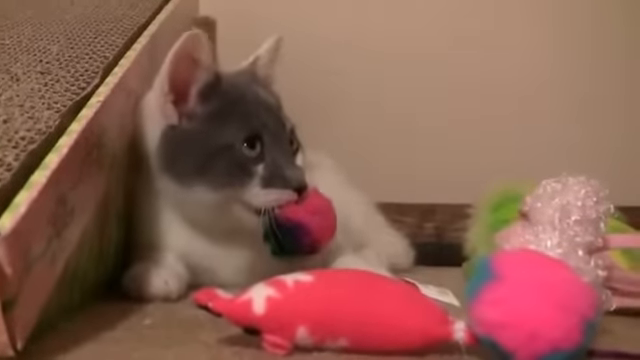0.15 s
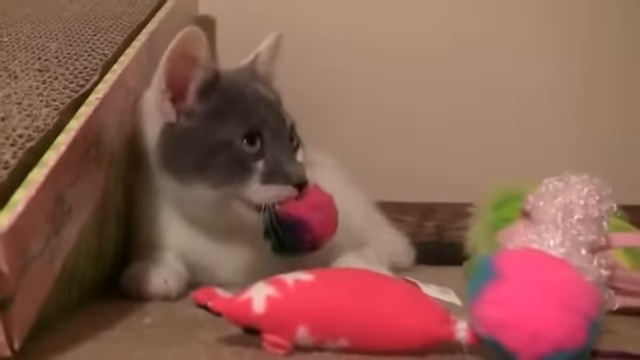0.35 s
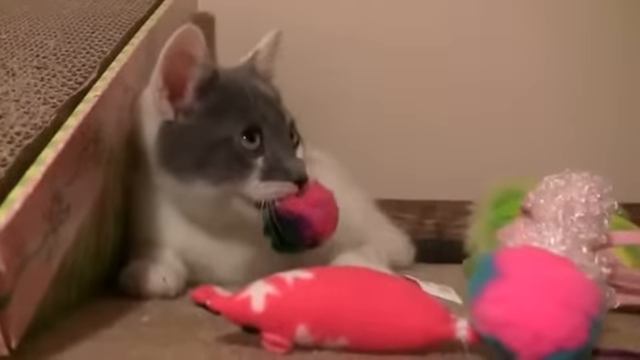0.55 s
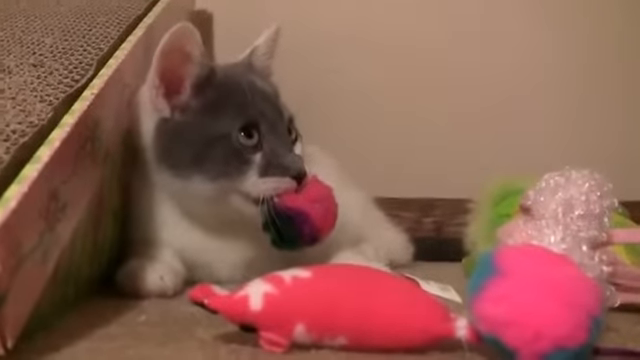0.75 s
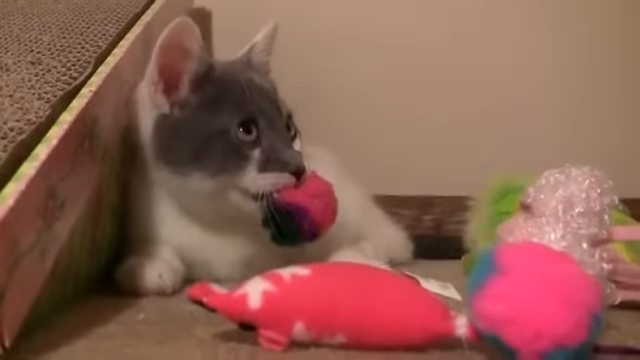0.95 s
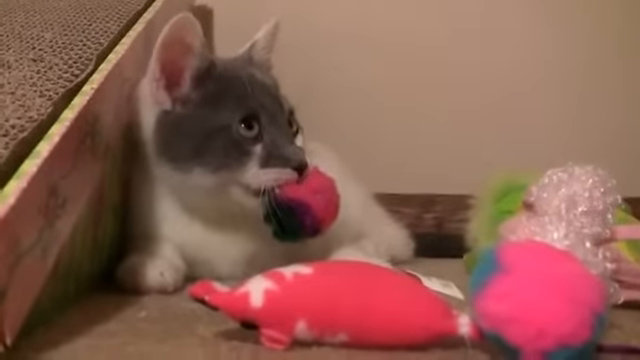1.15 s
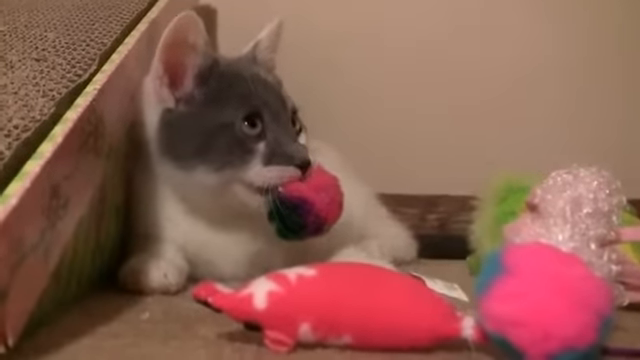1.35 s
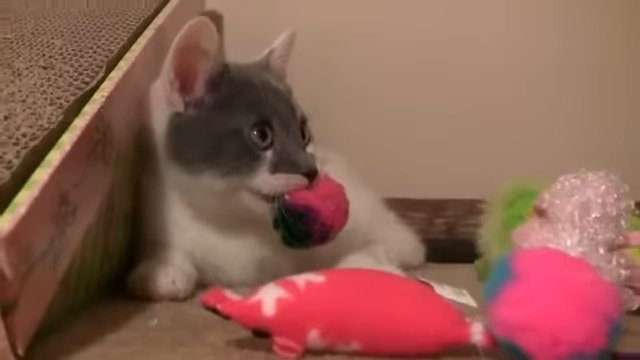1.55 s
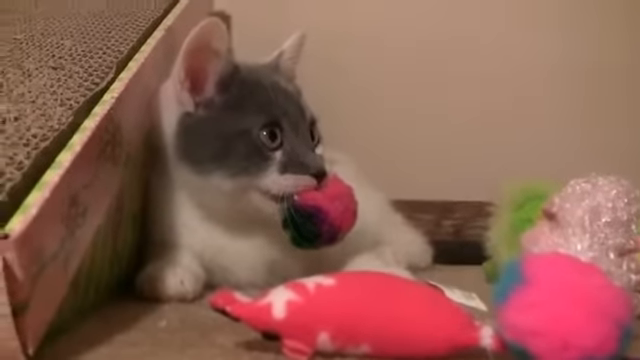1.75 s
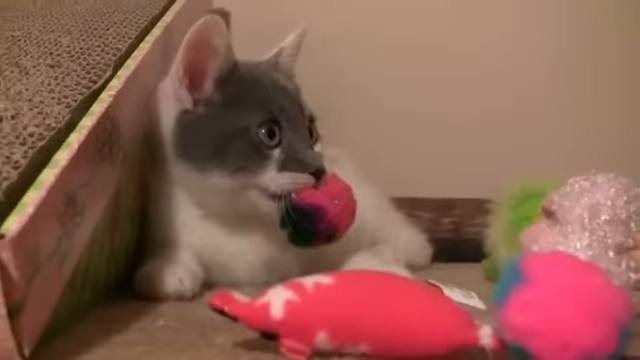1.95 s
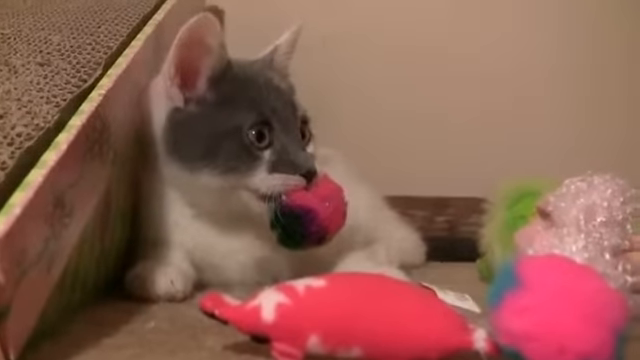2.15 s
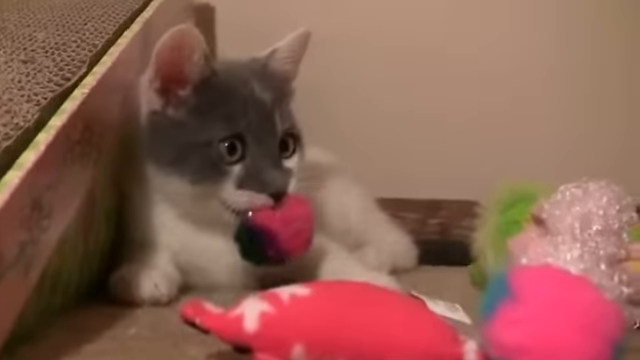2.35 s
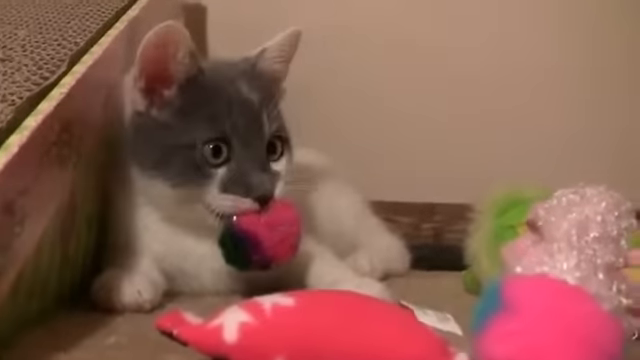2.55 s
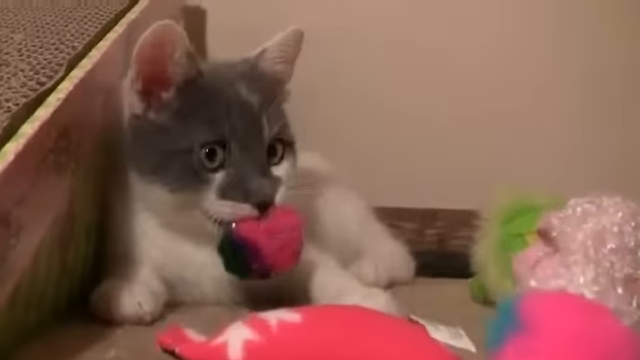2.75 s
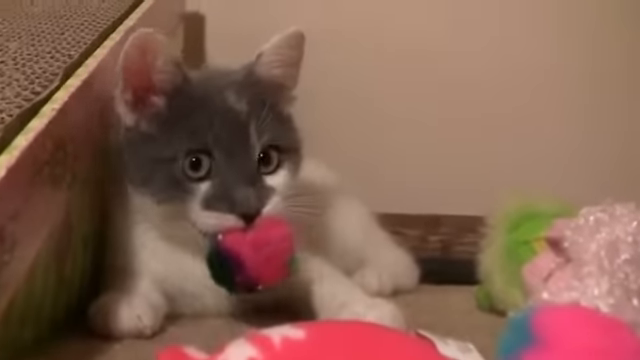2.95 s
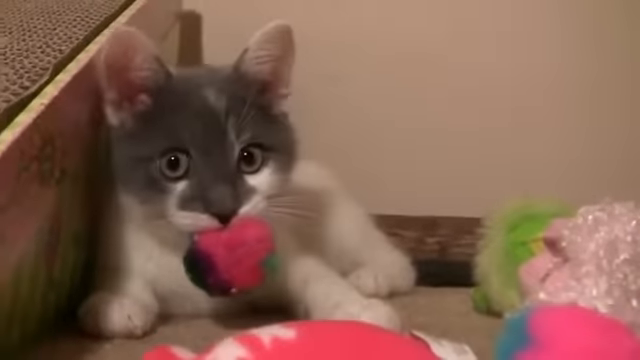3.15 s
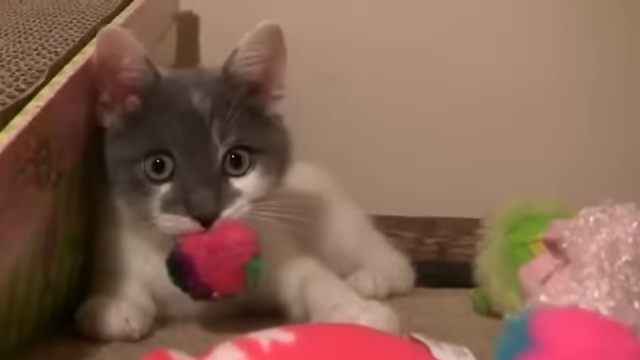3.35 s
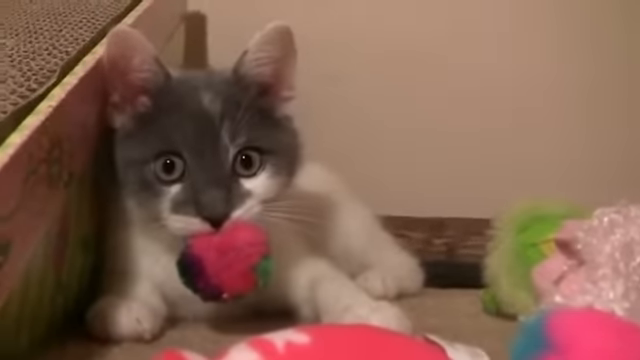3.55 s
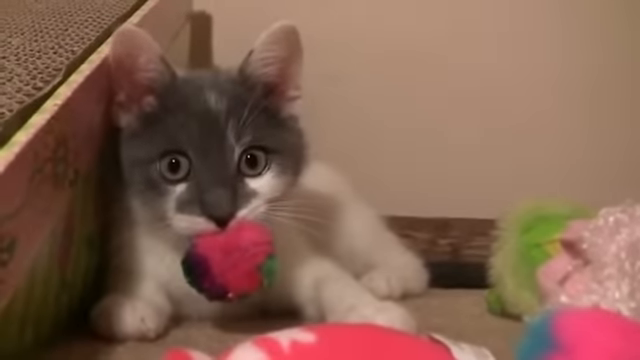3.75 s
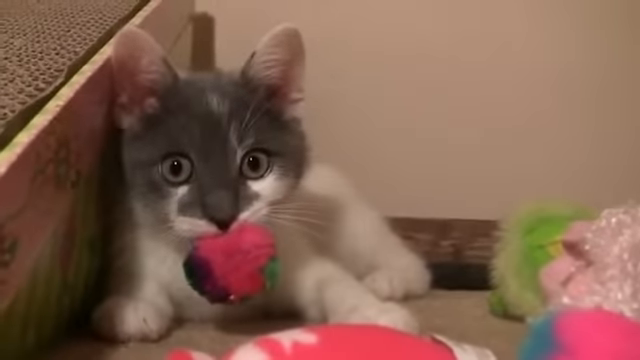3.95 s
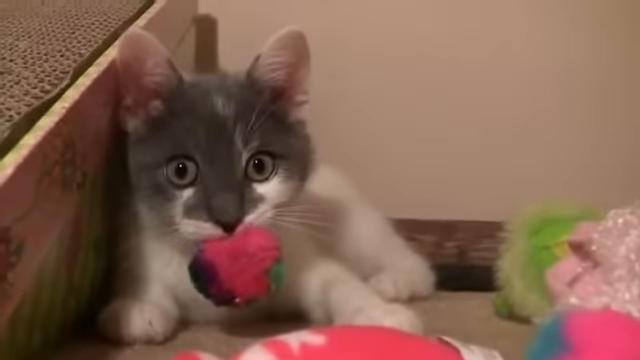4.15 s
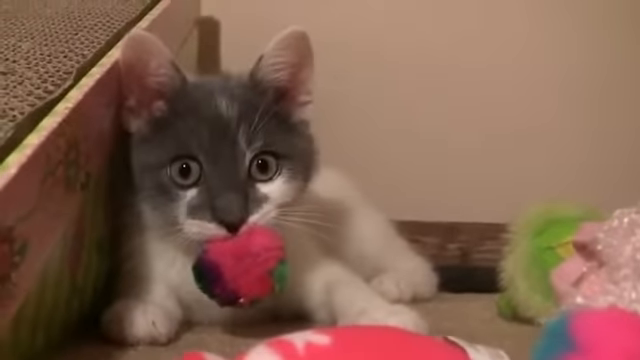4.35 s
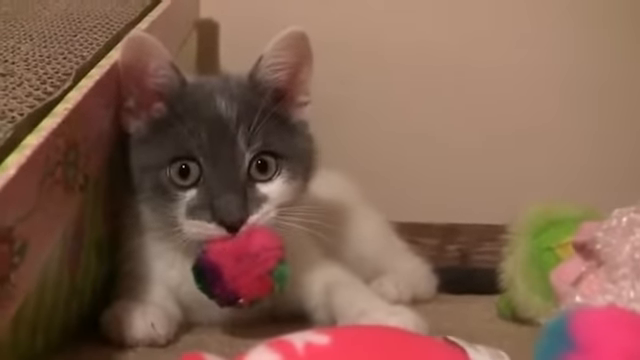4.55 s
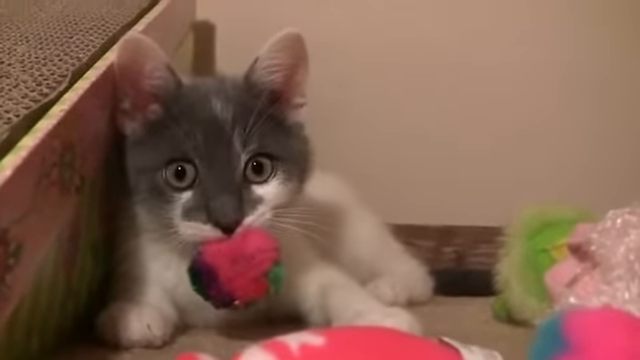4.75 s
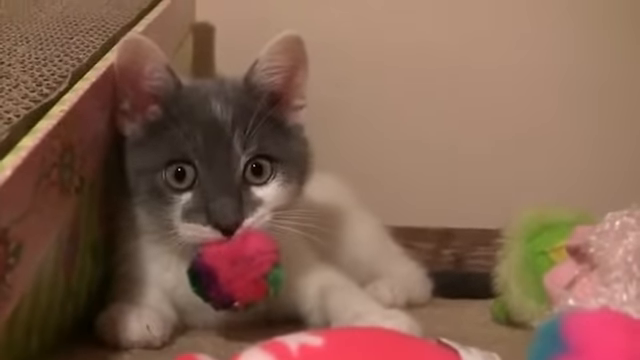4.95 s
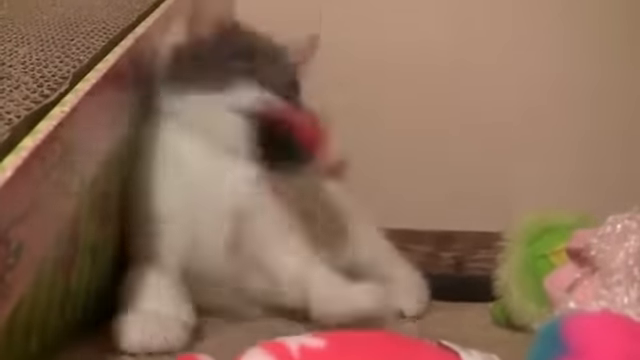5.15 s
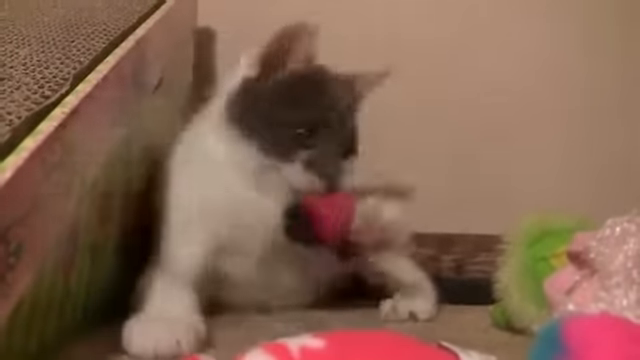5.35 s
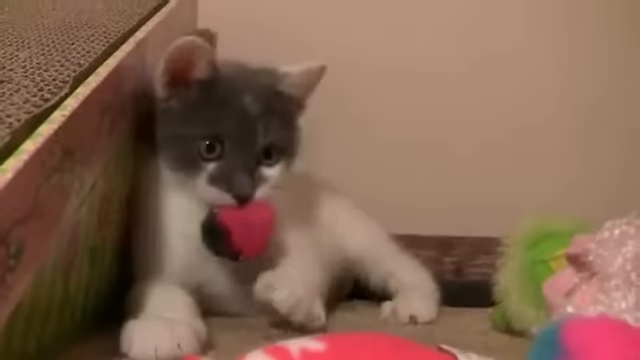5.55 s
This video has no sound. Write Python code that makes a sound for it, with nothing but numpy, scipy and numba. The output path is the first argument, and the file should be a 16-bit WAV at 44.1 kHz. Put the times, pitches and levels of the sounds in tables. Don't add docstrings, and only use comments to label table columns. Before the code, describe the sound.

A quiet small room with soft low air noise, faint hiss and a distant rush that swells gently now and then. A kitten is very close, slightly right of centre. From about 0.1 to 1.4 s it growls low and drawn out through a toy in its mouth: an uneven, rough, buzzing hum, starting higher and sinking, with thin whistling air in the nose and a tiny snort at the close. Faint creaks follow near 1.6 and 1.9 s, then small claw ticks around 2.5-2.8 s. A second growl runs from 3.0 to 4.3 s, starting softer, rising slightly, then sinking and ending strongly. Quiet returns until a claw tick at 5.1 s. At 5.2 s bright foil snaps and crinkles burst out, with fur and claws scraping and a short dull floor knock near 5.4 s. Light shuffles, a crisp snap and a last scrape finish by 5.75 s.

```python
import sys
import numpy as np
from scipy import signal
from scipy.fft import rfft, irfft
from scipy.io import wavfile
from scipy.ndimage import uniform_filter1d
from numba import njit

SR = 44100
rng = np.random.default_rng(int(sys.argv[2]) if len(sys.argv) > 2 else 0)


def generate_wav(signal):
    frames = np.transpose(np.atleast_2d(signal))
    scaled = np.clip(frames, -1, 1) * 32767
    pcm = np.round(scaled).astype(np.int16)
    wavfile.write(sys.argv[1], SR, pcm)


def linear_from_db(decibels):
    return 10 ** (np.asarray(decibels, float) / 20)


N = 250488


def unit(x):
    return x / np.sqrt(np.mean(x ** 2))


def noise():
    return rng.standard_normal(N)


def log_curve(points, **outside):
    hz = np.arange(N // 2 + 1) * SR / N + 1
    f, db = np.transpose(points)
    return linear_from_db(np.interp(np.log(hz), np.log(f), db, **outside))


def colour(x, points):
    spectrum = rfft(x)
    own = np.sqrt(uniform_filter1d(abs(spectrum) ** 2, size=1500))
    return unit(irfft(spectrum / own * log_curve(points, left=-90, right=-90), N))


def ring(x, hz, width):
    b, a = signal.iirpeak(min(hz, 11000), max(hz / width, .3), fs=SR)
    return signal.lfilter(b, a, x)


def ring_twice(x, hz, width):
    return ring(ring(x, hz, width), hz, width)


def walk(rate):
    k = int(SR / rate)
    held = np.repeat(rng.standard_normal(N // k + 1), k)
    return unit(uniform_filter1d(uniform_filter1d(held, k), k)[:N])


def envelope(start, length, db, rise, sag, fall):
    t = np.arange(N)[:, None] / SR - start
    shape = db + rise * np.minimum(t, 0) - sag * np.clip(t, 0, length) - fall * np.maximum(t - length, 0)
    return np.sqrt((linear_from_db(shape) ** 2).sum(axis=1))


# frequency in Hz, difference over sum in dB.
WIDENING = [(12, 4), (120, 1), (240, 5), (650, 1.5), (1600, 3.5), (2500, 6), (5000, 2.5), (22000, -0.5)]


def wide(points):
    mid, side = colour(noise(), points), colour(noise(), points)
    return mid, irfft(rfft(side) * log_curve(WIDENING), N) * np.array([[1], [-1]])


# frequency in Hz, density in dB per Hz.
AIR_COLOUR = [(12, -48), (20, -18.5), (76, -2), (132, -5), (168, 1), (191, -6), (340, -4.5), (546, -8),
              (810, -8.5), (1080, -22.5), (1300, -31.5), (4820, -24.5), (10600, -31), (13800, -104),
              (22000, -120)]
# frequency in Hz, density in dB per Hz.
RUSH_COLOUR = [(250, -33), (450, -5.5), (560, -7), (630, 3.5), (720, -9), (1000, -3.5), (1600, -9),
               (2600, -17), (4000, -26.5)]
# start in seconds, length in seconds, level in dB.
RUSH_SWELLS = [
    (-.1, 0.32, -54.5),
    (0.393, .12, -56),
    (.7, 0.45, -58.5),
    (1.315, 0.17, -56),
    (1.72, 0.18, -58),
    (2.124, 0.4, -58),
    (3.7, 0.64, -62.5),
]


def house():
    swell = envelope(*np.transpose(RUSH_SWELLS), rise=61, sag=4, fall=168)
    air = linear_from_db(-51 + .4 * walk(3)) * sum(wide(AIR_COLOUR))
    mid, side = wide(RUSH_COLOUR)
    steady = linear_from_db(-64)
    rush = np.hypot(steady, swell) * mid + np.hypot(steady, linear_from_db(-11) * swell) * side
    ears = linear_from_db(np.array([[-.3], [.3]]))
    return (air + linear_from_db(8 + walk(12)) * rush) * ears


# time in seconds, rate of the lowest tissue in Hz, effort in dB,
# air through the nose in dB.
GROWLS = [
    [(0.115, 160.9, -33.5, -60), (0.2, 148.6, -38, -58.5), (0.53, 150.2, -35.5, -59),
     (0.75, 148.6, -32, -54), (0.86, 149.6, -37, -59), (0.97, 155.3, -32.5, -61), (1.1, 150.5, -32, -56),
     (1.3, 141, -34, -56), (1.435, 134.1, -32.5, -50.5)],
    [(2.98, 146.7, -41, -64), (3.19, 146.8, -37.5, -55), (3.3, 151, -37, -60), (3.52, 157.2, -32, -59),
     (3.63, 154.8, -32, -54.5), (3.74, 151.9, -34, -55.5), (3.96, 145.8, -35, -54.5),
     (4.18, 137.7, -33, -56.5), (4.325, 134.6, -30.5, -56.5)],
]
ATTACK_DB_PER_S, RELEASE_DB_PER_S = 598, 537
MIDDLE_ABOVE_HZ, MIDDLE_SAG_HZ, HIGH_ABOVE_HZ = 62, 5, 89.5
SLACK_HZ, SLACK_PULL = 146.1, .5
MIDDLE_DB, HANDOVER_DB_PER_HZ, HIGH_DB, HIGH_GAIN_DB_PER_HZ = -11, 2.02, -12.5, 0.7
TAUT_HZ, TAUT_DB_PER_HZ, HIGH_STOPS_S = 151, 3, 0.15
RASP_DB, RASP_FOLLOWS, RASP_ARCH_DB = [-42, -41], 0.25, [0, 2.5]
RASP_BUILD_S, RASP_BUILD_DB = [0.014, 0.15], -5.5
SNORT_DB, SNORT_S, SNORT_LATE_S = [-44, -44], 0.022, 0.029


def throat():
    t, rows = np.arange(N) / SR, np.vstack(GROWLS)
    start, end = np.array([(g[0][0], g[-1][0]) for g in GROWLS]).T
    which = (t > (end[0] + start[1]) / 2) * 1
    since, after = t - start[which], t - end[which]
    progress = np.clip(since / (end - start)[which], 0, 1)
    gate_db = ATTACK_DB_PER_S * np.minimum(since, 0) - RELEASE_DB_PER_S * np.maximum(after, 0)
    gate_db = np.maximum(gate_db, -120)
    low, effort, nose_db = (np.interp(t, rows[:, 0], column) for column in rows.T[1:])
    slack = np.maximum(SLACK_HZ - low, 0)
    middle_hz = low + MIDDLE_ABOVE_HZ - MIDDLE_SAG_HZ * progress - SLACK_PULL * slack
    hz = np.array([low, middle_hz, low + HIGH_ABOVE_HZ])
    middle = MIDDLE_DB + HANDOVER_DB_PER_HZ * slack + 3 * walk(9)
    low_db = effort + gate_db - 10 * np.log10(1 + linear_from_db(middle) ** 2)
    high_db = effort + gate_db + HIGH_DB + 5 * np.exp(-progress / 0.086)
    high_db = high_db + HIGH_GAIN_DB_PER_HZ * slack + 2 * walk(12)
    high_db = high_db - TAUT_DB_PER_HZ * np.maximum(low - TAUT_HZ, 0)
    high_db = high_db - 160 * np.clip(after + HIGH_STOPS_S, 0, .3)
    rasp_db = np.take(RASP_DB, which) + RASP_FOLLOWS * (effort - rows[:, 2].mean()) + 1.3 * gate_db
    rasp_db = rasp_db + np.take(RASP_ARCH_DB, which) * np.sin(np.pi * progress)
    rasp_db = rasp_db + RASP_BUILD_DB * np.clip(1 - since / np.take(RASP_BUILD_S, which), 0, 1)
    whistle = linear_from_db(nose_db + 1.7 * walk(5.2) + gate_db)
    snort = envelope(end + SNORT_LATE_S, 0, np.array(SNORT_DB), rise=6 / SNORT_S, sag=0, fall=810)
    return hz, np.array([low_db, low_db + middle, high_db]), linear_from_db(rasp_db), np.hypot(whistle, snort)


# times the low rate, times the middle, times the high, level in dB.
SUM_TONES = [(1, 1, 0, -11), (2, 1, 0, -16), (3, 0, 0, -19), (-1, 0, 2, -12)]


def throat_hum(phase, db):
    hum = np.sqrt(2) * sum(linear_from_db(d + 1.4 * walk(45)) * np.sin(p) for d, p in zip(db, phase))
    for *times, tone_db in SUM_TONES:
        mean_db = np.abs(times) @ db / np.abs(times).sum()
        gain = linear_from_db(mean_db + tone_db + 2.5 * walk(25))
        hum = hum - np.sqrt(2) * gain * np.cos(np.array(times) @ (phase + np.pi / 2))
    return hum


def throat_slaps(swing, db):
    share = linear_from_db(db / 3) / np.sqrt(linear_from_db(db / 1.5).sum(axis=0))
    closing = (share * np.exp(-5 * (1 + swing))).sum(axis=0)
    contact = np.maximum(.3 - (share * swing).sum(axis=0), 0)
    return contact ** 1.2 + .45 * closing


# frequency in Hz, density in dB per Hz.
THROAT_COLOUR = [(150, -34), (255, -4.5), (271, -0.5), (306, -9), (360, -10), (399, -7), (450, -1.5),
                 (583, 2), (647, -6), (860, -6.5), (1080, -24), (1300, -20), (2000, -52), (2600, -64),
                 (4400, -120)]


def throat_rasp(slap):
    rasp = colour(-slap * (1 + .2 * walk(1200)) + .08 * walk(1200), THROAT_COLOUR)
    return unit(rasp / (.15 + uniform_filter1d(rasp ** 2, size=700)) ** .3)


# frequency
# in Hz, width in Hz, level against the rasp in dB.
LOW_RINGS = [(89, 30, -18.5), (184.2, 46, -0.5), (310.4, 36, -5)]


def low_rings(slap):
    shake = slap * noise()
    return sum(linear_from_db(db) * unit(ring_twice(shake, hz, width)) for hz, width, db in LOW_RINGS)


# frequency in Hz, width in Hz, level in dB.
NOSE = [(3565, 468, 7.5), (3230, 280, 3.5), (5200, 860, -15), (8570, 860, -10.5)]


def nose_whistle(slap):
    puffs = (.2 + slap ** 1.2) * linear_from_db(1.2 * walk(40)) * noise()
    return unit(sum(linear_from_db(db) * ring_twice(puffs, hz, width) for hz, width, db in NOSE))


def growl():
    hz, db, rasp_gain, whistle_gain = throat()
    phase = np.cumsum(2 * np.pi * hz / SR, axis=1) + [.12 * walk(90) for _ in hz]
    slap = throat_slaps(np.sin(phase), db)
    voice = throat_hum(phase, db) + rasp_gain * (throat_rasp(slap) + low_rings(slap))
    return voice + linear_from_db(-4) * whistle_gain * nose_whistle(slap)


def taps(events):
    out, t = np.zeros(N), np.arange(4000) / SR
    for s, db, hz, t60, width in events:
        blow = 0.41 * min(width, 1) * rng.standard_normal(len(t)) * linear_from_db(-60 * t / t60)
        blow[0] = 3
        blow = ring(ring(blow, hz, width * hz), hz, 3 * width * hz)
        i = int(s * SR)
        out[i:i + len(t)] += (linear_from_db(db) * blow / abs(blow).max())[:N - i]
    return out


# start in seconds, peak in dB, frequency in Hz, t60 in seconds,
# width over frequency.
TICKS = [
    (1.55, -39, 400, 0.039, 0.27),
    (1.895, -34.5, 465, .05, 0.37),
    (2.671, -33, 810, .015, 0.36),
    (2.747, -43, 1799, .005, 0.82),
    (5.133, -33, 1180, 0.026, 0.53),
    (5.133, -48, 2600, .006, 1.1),
    (5.343, -31.5, 1600, 0.0066, 0.41),
    (5.569, -38, 2960, 0.008, 1.1),
]
PRICKS = [
    (2.511, -44, 5000, .01, .3),
    (2.582, -47, 4800, .014, .2),
    (2.671, -44, 5500, .005, .6),
    (2.775, -49, 4800, .008, .3),
    (4.331, -43, 3400, .03, .15),
    (4.342, -44, 3700, .03, .12),
    (5.133, -41, 3900, .008, .3),
]
KNOCKS = [
    (5.359, -31, 543, 0.045, 0.22),
    (5.366, -28.5, 880, 0.033, 0.16),
    (5.379, -24.5, 344, 0.044, 0.46),
    (5.38, -32.5, 189, 0.11, 0.1),
    (5.393, -32, 293, 0.05, 0.12),
    (5.37, -42.5, 74.6, .3, 0.47),
]


def claws_and_knock():
    return taps(TICKS + PRICKS + KNOCKS)


# start in seconds, length in seconds, scrape on the mat in dB, claws in dB,
# foil in dB.
MOVES = [
    (5.208, 0.034, -59, -57, -54.5),
    (5.237, .04, -49, -61, -60),
    (5.307, 0.033, -49, -49, -56),
    (5.339, .045, -40, -55, -49),
    (5.4, 0.08, -44, -55, -52),
    (5.513, 0.055, -53.5, -63, -58),
    (5.677, .05, -49, -57, -63),
]
# frequency in Hz, density in dB per Hz.
SCRAPE_COLOUR = [(59, -40.5), (100, -2.5), (785, -3), (863, -4.5), (1070, -9), (1190, -8), (2500, -20.5),
                 (3250, -49), (5500, -120)]
# frequency in Hz, density in dB per Hz.
CRINKLE_COLOUR = [(3000, -30), (4000, -9), (6200, -7), (7000, -1), (8400, 0), (10000, -1), (10600, -12),
                  (11500, -50)]
# start in seconds, peak in dB, frequency in Hz.
SNAPS = [(5.1956, -48, 6760), (5.1956, -32, 7800), (5.2044, -34, 8910), (5.219, -21, 8950),
         (5.2298, -21, 8550), (5.2384, -36, 9200), (5.2464, -34, 10000), (5.3043, -29, 10100),
         (5.333, -35, 7720), (5.3428, -42, 8240), (5.5004, -29, 10000), (5.5528, -38, 8500),
         (5.57, -22.5, 9853)]


def jerk():
    s, length, scrape_db, claws_db, foil_db = np.transpose(MOVES)
    grains = noise() * linear_from_db(1.5 * walk(250))
    scrape = envelope(s, length, scrape_db, rise=300, sag=63, fall=202) * colour(grains, SCRAPE_COLOUR)
    claws = envelope(s, length, claws_db - 5.5, rise=300, sag=63, fall=202)
    claws = claws * unit(ring_twice(grains, 3300, 3800))
    crinkle = colour(noise() * linear_from_db(2 * walk(460)), CRINKLE_COLOUR)
    crinkle = envelope(s, length, foil_db, rise=602, sag=63, fall=602) * crinkle
    snaps = taps([(s, db - 4, hz, .005, .25) for s, db, hz in SNAPS])
    return scrape + claws + crinkle + snaps


@njit
def walls(x, lags, gain, damp):
    line, soft, out = np.zeros((8, 4096)), np.zeros(8), np.zeros((2, len(x)))
    for i in range(len(x)):
        total = 0.
        for k in range(8):
            soft[k] += (1 - damp) * (gain[k] * line[k, (i - lags[k]) & 4095] - soft[k])
            total += soft[k]
            out[k % 2, i] += soft[k]
        for k in range(8):
            line[k, i & 4095] = x[i] + soft[k] - total / 4
    return out


def small_room(near):
    t60_s, room_db, side_db = .22, -17.5, -3.5
    lags = np.array([431, 557, 673, 811, 947, 1123, 1301, 1487])
    left, right = walls(near + 1e-18, lags, linear_from_db(-60 * lags / SR / t60_s), .35)
    return linear_from_db(room_db) * (left + right) / 2, linear_from_db(room_db + side_db) * (left - right) / 2


def scene():
    near = growl() + jerk() + claws_and_knock()
    mid, side = small_room(near)
    high_pass = signal.butter(2, 220, "high", fs=SR, output="sos")
    side = signal.sosfilt(high_pass, side + linear_from_db(-8) * jerk())
    ears = linear_from_db(np.array([[-1.4], [-.5]]))
    return ears * near + np.array([mid + side, mid - side]) + house()


def roll_off(x):
    return signal.sosfilt(signal.butter(12, 11420, fs=SR, output="sos"), x)


def record(dry):
    top = signal.ellip(10, .2, 85, 10230, fs=SR, output="sos")
    mix = signal.sosfilt(top, dry)
    return roll_off(mix)


dry = scene()
out = record(dry)
generate_wav(out)
```